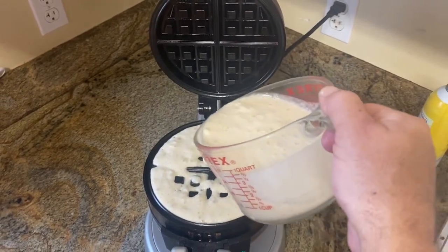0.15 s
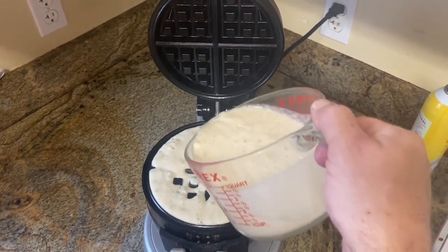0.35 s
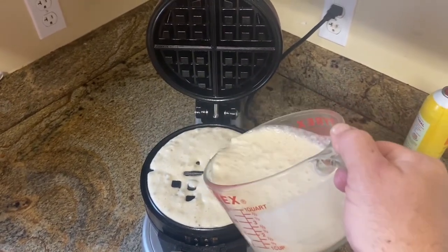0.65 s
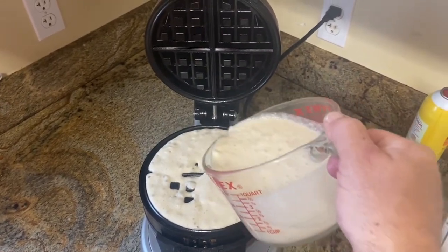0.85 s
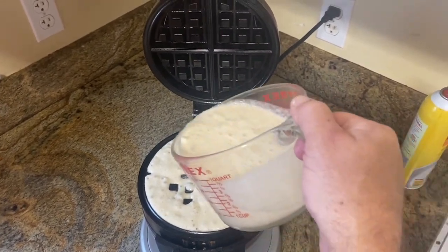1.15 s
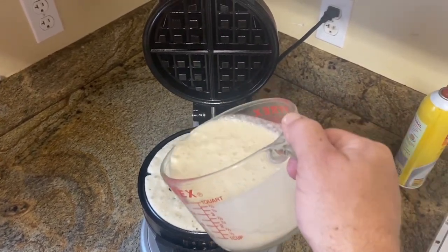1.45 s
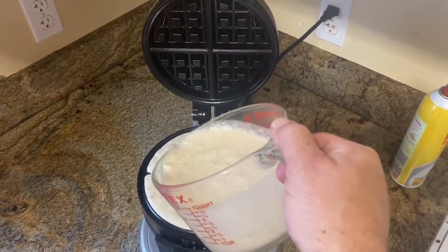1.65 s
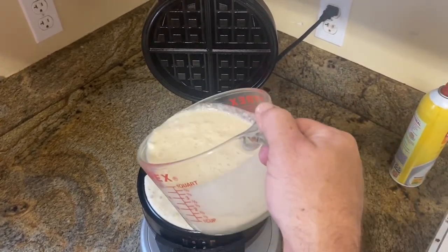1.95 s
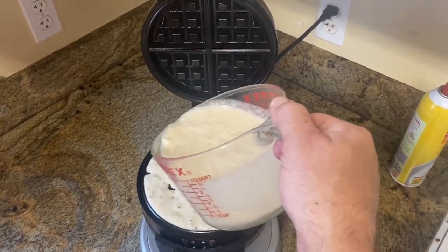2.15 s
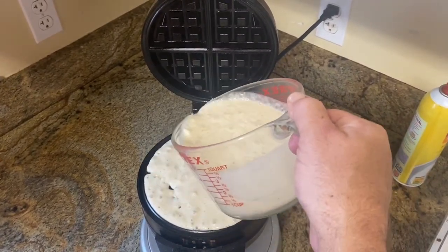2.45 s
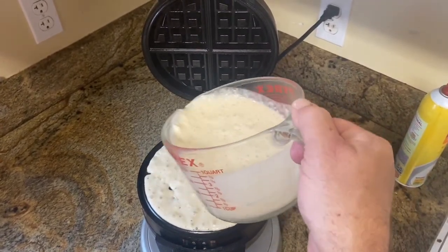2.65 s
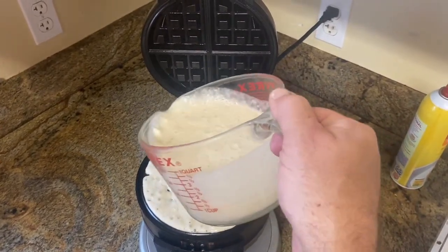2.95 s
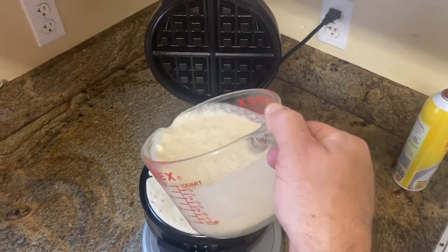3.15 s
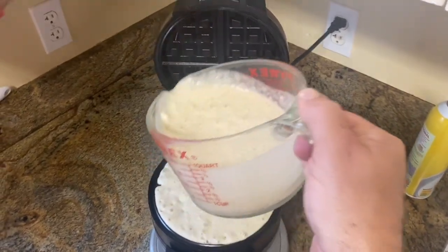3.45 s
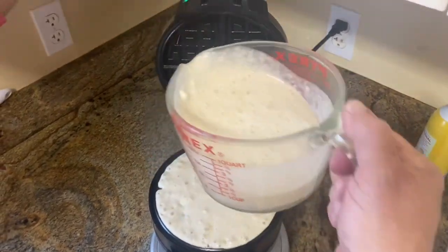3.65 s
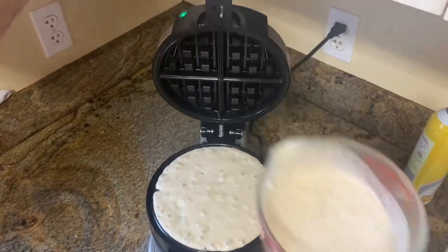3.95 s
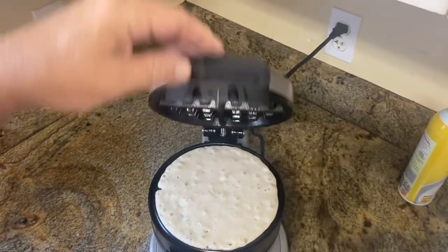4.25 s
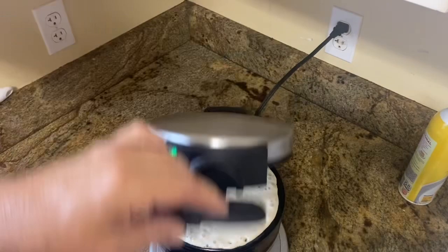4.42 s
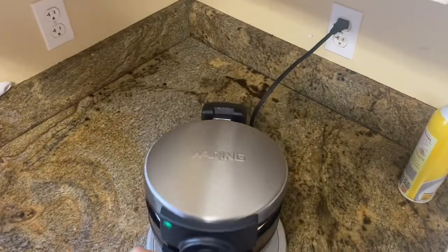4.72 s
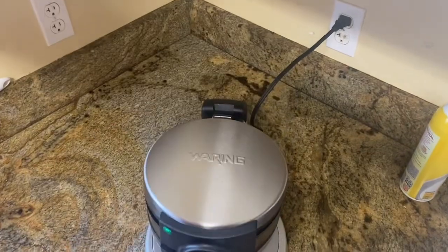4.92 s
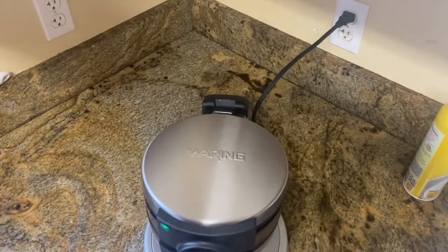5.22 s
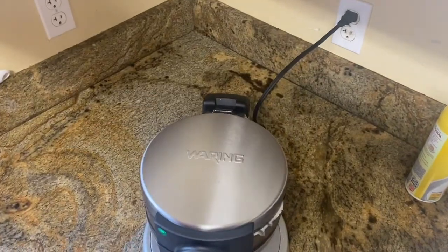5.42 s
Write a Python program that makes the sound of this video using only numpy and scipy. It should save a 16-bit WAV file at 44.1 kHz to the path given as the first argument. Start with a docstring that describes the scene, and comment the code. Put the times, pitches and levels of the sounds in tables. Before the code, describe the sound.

Batter sizzles faintly on a hot waffle iron, then the metal lid clunks shut and steam hisses.

```python
"""Batter sizzles on a hot waffle plate in a quiet kitchen; an appliance hums far off.
Single bubbles pop as the fizz slowly calms. The lid swings down and steam hisses from the gap.
At 4.92 s the iron plates clunk together and thump the counter; they rattle, then the catch clicks.
A small camera listens through two ports a few centimetres apart."""
import sys
import numpy as np
from scipy import signal
from scipy.fft import rfft, irfft, next_fast_len
from scipy.io import wavfile
from scipy.ndimage import uniform_filter1d

SR = 44100
rng = np.random.default_rng(int(sys.argv[2]) if len(sys.argv) > 2 else 0)


def to_wav(sig):
    """Store sig (one row per channel, or 1-D mono) as 16-bit WAV at the path in sys.argv[1].

    Samples outside -1..1 are clipped; the rate is SR.
    """
    pcm = np.clip(np.atleast_2d(sig), -1, 1) * 32767
    pcm = np.round(pcm).astype(np.int16)
    wavfile.write(sys.argv[1], SR, pcm.T)  # frames by channels


N = 246078
LEAD_IN_S = 0.02  # run-up to each contact

# modes of the iron plates: pitch_hz, level_db, t60_s
PLATE_MODES = [(233, 3, 0.054), (317.4, 1, 0.065), (430, -1.5, 0.038), (519, -1, 0.035), (620, 5.5, 0.042),
               (663, -1.5, 0.046), (728, -10, 0.052), (770, -8, 0.064), (812, -7, 0.04), (883, -2, 0.057),
               (980, -7, 0.06), (1076, 4, 0.02), (1190, -0.5, 0.025), (1245, -4, .03), (1384, 4.5, 0.02),
               (1550, -7, 0.018), (1706, 3.5, 0.015), (1800, -4, 0.02), (2014, -7, 0.026),
               (2110, -3, 0.037), (2240, -4, .02), (2400, 1, 0.02), (2560, -5, 0.022), (2710, 4.5, 0.015),
               (2940, 5.5, 0.016), (3260, 2.5, 0.013), (3650, -1, 0.0089), (4220, 6.5, 0.011),
               (4800, 1, .008), (5400, -4, .008)]


def amp(db):
    return 10 ** (np.asarray(db) / 20)


def unit_rms(x):
    return x / np.sqrt(np.mean(x ** 2) + 1e-20)


def at_hz(points, hz, column=1):
    """Table column, interpolated over log frequency."""
    table = np.transpose(points)
    return np.interp(np.log(hz + 1), np.log(table[0] + 1), table[column])


def coloured(x, colour):
    """Stereo signal shaped by a spectrum, rms 1."""
    size = next_fast_len(N)
    gain = amp(at_hz(colour, np.fft.rfftfreq(size, 1 / SR)))
    return unit_rms(irfft(rfft(x, size) * gain, size)[:, :N])


def band(x, low_hz, top_hz):
    """Band-pass that keeps the rms of white noise."""
    passed = signal.sosfilt(signal.butter(3, [low_hz, top_hz], "band", fs=SR, output="sos"), x)
    return passed / np.sqrt((top_hz - low_hz) / SR * 2)


def drift(smooth_s):
    """Smoothed noise, rms 1."""
    size = round(smooth_s * SR)
    return unit_rms(uniform_filter1d(uniform_filter1d(rng.standard_normal(N), size), size))


def house():
    """Lumpy low murmur and the wavering hum of a distant motor."""
    # murmur envelope: time_s, level_db
    envelope = [(0, -54), (.3, -56), (.6, -56.5), (1.5, -53.5), (2, -57), (3.0, -56.5), (4.2, -56.5),
                (4.8, -54.5), (5.58, -48.5)]
    # murmur spectrum: freq_hz, gain_db
    colour = [(15, -45), (30, -21), (42, 0.5), (52, 2), (65, 2.5), (80, 0), (140, -7.5), (200, -1.5),
              (270, -8), (330, -3.5), (400, -9.5), (550, -14), (900, -18), (1500, -21.5), (3000, -21),
              (5000, -78)]
    # motor lines: pitch_hz, width_hz, level_db
    hum_lines = [(98.8, 7.7, -56.5), (120.3, 6.4, -67), (203.3, 8.7, -67), (235, 6.3, -68.5),
                 (301.3, 14.5, -67.5), (426, 16, -72)]
    throb_period_s, throb_crest_s, throb_depth = 0.752, 1.08, 0.29  # lowest line only
    t = np.arange(N) / SR
    murmur_db = np.interp(t, *np.transpose(envelope)) + 1.1 * drift(0.019)
    sound = amp(murmur_db) * coloured(rng.standard_normal((2, N)), colour)
    throb = 1 + throb_depth * np.cos(2 * np.pi * (t - throb_crest_s) / throb_period_s)
    for hz, width_hz, db in hum_lines:
        waver = 0.5 * (drift(0.38 / width_hz) + 1j * drift(0.31 / width_hz))
        strength = throb if hz == hum_lines[0][0] else 1
        sound += amp(db) * ((strength + waver) * np.exp(2j * np.pi * hz * t)).real
    return sound


def kitchen_reverb(x, level_db=-15, delay_s=0.0037):
    """Room tail: noise, each band dying at its own rate."""
    # room decay: freq_hz, t60_s
    decay = [(100, 0.099), (500, 0.59), (2000, 0.46), (5000, 0.4), (12000, 0.18)]
    hz, t, spectra = signal.stft(rng.standard_normal((2, SR // 2)), SR, nperseg=256)
    tail = signal.istft(spectra * amp(-60 * t / at_hz(decay, hz)[:, None]), SR, nperseg=256)[1]
    tail = np.pad(tail, ((0, 0), (round(delay_s * SR), 0)))
    return amp(level_db) * signal.fftconvolve(x, tail / np.linalg.norm(tail[0]), axes=1)[:, :N]


def bubbling(rate_per_s, spread_db, grain, flicker_db):
    """Countless tiny bubbles: smooth hiss, with nearer millisecond bursts standing out."""
    sizes = amp(spread_db * np.minimum(rng.exponential(1, N), 3.2))
    onsets = rng.random(N) < rate_per_s / SR
    bursts = signal.lfilter([1], [1, -np.exp(-1 / (0.0012 * SR))], sizes * onsets)
    envelope = amp(flicker_db * drift(0.0049)) * np.sqrt(1 + (grain * unit_rms(bursts)) ** 2)
    return envelope * rng.standard_normal((2, N))


def patchy(x, depth_db):
    """Brief spurts in shifting bands as the bubbling spots wander."""
    spectra = signal.stft(x, nperseg=256)[2]
    patches = uniform_filter1d(rng.standard_normal(spectra.shape[1:]), size=8, axis=0)
    patches = uniform_filter1d(patches, size=24, axis=1)
    return signal.istft(spectra * amp(depth_db * unit_rms(patches)), nperseg=256)[1][:, :N]


def rim_hiss(level_db=-60.5):
    """Fine, steady hiss from the batter's rim, exposed as the fizz calms."""
    # hiss spectrum: freq_hz, gain_db
    colour = [(2500, -27), (3900, -13), (4800, -4), (5600, -11), (6300, -6), (8000, -0.5), (11000, 0.5),
              (13000, -3), (16000, -7.5)]
    bubbles = bubbling(rate_per_s=250, spread_db=3.2, grain=0.9, flicker_db=1.8)
    return amp(level_db) * patchy(coloured(bubbles, colour), depth_db=0.7)


def batter_fizz():
    """Batter on hot iron: calms to a simmer, drops again under the shut lid."""
    # fizz spectrum: freq_hz, gain_db
    colour = [(500, -20.5), (900, -12), (1300, -12.5), (1650, -4.5), (2240, -7.5), (2500, -1.5), (2800, -7),
              (3400, -2.5), (3900, -2), (4500, -2), (5300, -1), (6300, -4), (8000, -1.5), (10500, 0),
              (12000, -1), (14000, -9), (16000, -9)]
    # swells as batter spreads, then a dip as the lid lowers: centre_s, gain_db, width_s
    swells = [(.8, 1.5, 0.034), (1.0, 1.5, 0.53), (3.2, 2.5, 0.097), (4.1, 4, 0.26), (4.65, -1.5, .2)]
    start_db, calming_db_per_s, simmer_db = -42.5, 5.5, -61.5
    shut_s, covered_db = 4.92, -64
    t = np.arange(N) / SR
    level_db = np.where(t < shut_s, np.maximum(start_db - calming_db_per_s * t, simmer_db), covered_db)
    level_db += sum(db * np.exp(-((t - centre_s) / width_s) ** 2) for centre_s, db, width_s in swells)
    bubbles = bubbling(rate_per_s=500, spread_db=1.5, grain=0.51, flicker_db=0.88)
    return amp(level_db) * patchy(coloured(bubbles, colour), depth_db=0.84)


def pops():
    """Single bubbles burst: a spit of noise and a short ring at the bubble's pitch."""
    # loudest bubbles: start_s, spit_db, pitch_hz, ring_db
    bursts = [(0.1685, -28, 3930, -48), (1.865, -36, 3830, -50), (1.9737, -36, 4750, -52),
              (2.0795, -41, 7040, -52), (2.1515, -44, 7820, -52), (2.284, -40, 6250, -55),
              (2.3304, -34, 7590, -52), (2.391, -35, 7090, -48), (2.493, -34, 7550, -54),
              (2.503, -34, 4400, -47), (2.592, -44, 7100, -52), (2.6117, -37, 7900, -47),
              (2.700, -44, 4780, -52), (2.810, -38, 4790, -53), (2.832, -32.5, 7400, -50),
              (2.8886, -42, 7850, -54), (2.932, -34.5, 4800, -43), (3.1227, -37, 6900, -49),
              (3.2132, -36, 6860, -51), (3.2393, -38, 4770, -51), (3.5307, -39, 7550, -52),
              (3.84, -35.5, 7660, -53), (3.878, -34, 4150, -48), (3.9708, -36, 6950, -52),
              (3.989, -41, 7370, -53), (4.1587, -42, 5180, -54), (4.1767, -41, 7560, -53),
              (4.237, -35, 2230, -41), (4.366, -38.5, 7600, -54), (4.4825, -36.5, 2300, -44),
              (4.494, -43, 4200, -52), (4.606, -42, 3000, -55), (4.652, -41, 3000, -55),
              (4.8118, -42, 7290, -50)]
    # spit spectrum: freq_hz, gain_db
    colour = [(800, -18), (2000, -6), (4000, -3), (7000, 0), (11000, 3.5), (14000, -6), (16000, -9)]
    rise_s, spit_fade_s, ring_fade_s = 0.0004, 0.0017, 0.0028
    spits, rings = np.zeros((2, 2, N + SR))
    t = np.arange(SR // 20) / SR
    attack = np.minimum(t / rise_s, 1)
    for start_s, spit_db, hz, ring_db in bursts:
        at = slice(round(start_s * SR), round(start_s * SR) + len(t))
        noise = 0.5 * rng.standard_normal((2, len(t)))
        spits[:, at] += amp(spit_db) * noise * np.exp(-t / spit_fade_s) * attack
        rings[0, at] += amp(ring_db) * np.sin(2 * np.pi * hz * t) * np.exp(-t / ring_fade_s) * attack
    return coloured(spits[:, :N], colour) * np.std(spits[:, :N]) + rings[:, :N]


def steam(split_hz=4500):
    """Steam from the narrowing gap: thin at first, fuller as the plates close."""
    # steam spectrum: freq_hz, gain_db
    colour = [(1000, -24), (3000, -6.5), (5000, -5), (6000, -3.5), (7500, 0.5), (11000, -1.5), (12500, -5),
              (14000, -16), (16000, -12)]
    # steam envelope: time_s, level_db, gain_below_split_db
    envelope = [(4.7, -78, -10), (4.78, -61, -9), (4.825, -50.5, -7), (4.89, -47, -3), (4.92, -43, -3),
                (4.98, -50, -5), (5.08, -45, 1), (5.2, -44.5, -0.5), (5.58, -42, 2)]
    t = np.arange(N) / SR
    time_s, level_db, low_db = np.transpose(envelope)
    hiss = coloured(bubbling(rate_per_s=330, spread_db=3.3, grain=0.38, flicker_db=0.44), colour)
    low = signal.sosfiltfilt(signal.butter(3, split_hz, fs=SR, output="sos"), hiss)
    hiss = hiss - low + amp(np.interp(t, time_s, low_db)) * low
    return amp(np.interp(t, time_s, level_db)) * hiss


def counter_thump(t, hz, rise_s):
    """Counter rocks, falling in pitch to hz; a sudden landing rings a higher, shorter mode most."""
    fade_s, overshoot, drop_s = 0.046, 2.98, 0.00524
    knock_ratio, knock_db, knock_fade_s, sudden_s = 2.164, 4, 0.0118, 0.0095
    turns = hz * (t + overshoot * drop_s * (1 - np.exp(-t / drop_s)))
    thump = np.sin(2 * np.pi * turns) * (1 - np.exp(-t / rise_s)) ** 2 * np.exp(-t / fade_s)
    knock = np.sin(2 * np.pi * knock_ratio * hz * t) * t / knock_fade_s * np.exp(-t / knock_fade_s)
    return thump + amp(knock_db) * min(sudden_s / rise_s, 1) ** 1.07 * knock


def contact_noise(length_s, graze_db=-11.5, graze_s=0.0044):
    """Edges graze in the lead-in, then meet: fast rise, bell-curve fall."""
    t = np.arange(SR // 2) / SR - LEAD_IN_S
    impact = np.exp(-(t / length_s) ** 2) * np.clip(t / (0.075 * length_s), 0, 1)
    graze = amp(graze_db) * np.exp(-abs(t) / graze_s)
    return rng.standard_normal((2, len(t))) * (impact + graze)


def ringing(drive, modes):
    """Decaying modes excited by the drive."""
    t = np.arange(SR // 2) / SR
    ring = sum(amp(db - 60 * t / t60_s) * np.sin(2 * np.pi * hz * t) for hz, db, t60_s in modes)
    return signal.oaconvolve(drive, ring[None] / np.linalg.norm(ring), axes=1)[:, :N]


def free_ring(t, favoured_hz):
    """Plate modes near the favoured pitches, left free by the struck spot, ring longer."""
    width_octaves, t60_stretch, rise_s = 0.064, 2.2, 0.0036
    ring = np.zeros(len(t))
    for hz, _, t60_s in PLATE_MODES:
        weight = sum(np.exp(-(np.log2(hz / near) / width_octaves) ** 2) for near in favoured_hz)
        ring += weight * amp(-60 * t / (t60_stretch * t60_s)) * np.sin(2 * np.pi * hz * t)
    return ring * np.minimum(t / rise_s, 1)


def waffle_iron():
    """Each blow rings the plates and catch and rocks the counter; the loose plates chatter on."""
    # blows: start_s, plates_db, chatter_db, catch_db, thump_db, thump_hz, thump_rise_s,
    # length_s, low_hz, top_hz, ring_db, favoured_1_hz, favoured_2_hz
    blows = [(.159, -53, -80, -80, -50, 179.4, 0.0042, 0.012, 151, 584, -70, 320, 430),
             (0.197, -60, -73, -80, -42.5, 82.3, 0.0064, .01, 149, 407, -68, 233, 320),
             (4.922, -7.5, -23.5, -22.5, -52, 69, 0.0081, 0.0075, 770, 4200, -11.5, 1185, 1800),
             (4.9265, -11.5, -21.5, -30, -17, 69.4, 0.027, 0.0056, 224, 4800, -15, 310.4, 620),
             (4.963, -35, -45, -45, -50, 69, .007, .005, 700, 2500, -29, 2080, 980),
             (4.989, -35.5, -49, -46, -35, 68.4, .007, 0.025, 300, 2510, -29, 865, 2014),
             (5.122, -39, -40, -59, -31.5, 66.1, 0.018, 0.02, 400, 2480, -40, 1830, 1550),
             (5.213, -34, -34.5, -49, -30, 56.6, .015, 0.0092, 400, 1540, -28, 526, 1396),
             (5.262, -32, -41, -30, -36, 60, 0.0066, 0.0025, 3800, 5200, -47, 2710, 4290),
             (5.298, -31.5, -36, -45, -35.5, 54.6, 0.0053, 0.011, 458, 2130, -26.5, 620, 1640),
             (5.4167, -21.5, -23.5, -15, -27, 53.8, 0.005, 0.0094, 297, 8500, -24, 430, 1245),
             (5.435, -32, -44, -26, -59, 53, 0.0076, 0.0059, 600, 3800, -25.5, 748, 650),
             (5.472, -46.5, -54, -34.5, -29.5, 50.5, 0.0062, 0.041, 534, 960, -33, 760, 670)]
    # hand and hinge rubs: start_s, length_s, level_db, low_hz, top_hz
    rubs = [(0, 0.24, -60, 285, 503), (4.299, 0.2, -66, 493, 860), (4.6, 0.1, -69, 395, 800),
            (5.278, 0.033, -39.5, 800, 4000)]
    # modes of the catch: pitch_hz, level_db, t60_s
    catch_modes = [(2275, -2.5, 0.029), (4050, -9, 0.011), (4140, 1, 0.013), (4580, 1.5, 0.013),
                   (4750, -6, 0.0079), (6400, -30, 0.0051), (7470, -4, 0.026), (7930, 5.5, 0.019),
                   (8240, -1, 0.0064), (10160, 6, 0.0089), (11570, 4.5, 0.0084), (11950, 4, 0.0066),
                   (14900, -5, 0.0066)]
    chatter_fade_s, chatter_band_hz, catch_chatter_db = 0.022, (249, 3400), -15
    tracks = np.zeros((4, 2, N + SR))  # begin one lead-in early
    plates, catch, thump, ring = tracks
    t = np.maximum(np.arange(SR // 2) / SR - LEAD_IN_S, 0)
    settling = np.exp(-t / chatter_fade_s)
    for (start_s, plates_db, chatter_db, catch_db, thump_db, thump_hz, thump_rise_s,
         length_s, low_hz, top_hz, ring_db, *favoured_hz) in blows:
        at = slice(round(start_s * SR), round(start_s * SR) + len(t))
        contact = contact_noise(length_s)
        chatter = rng.standard_normal((2, len(t))) * settling * np.minimum(t / length_s, 1)
        # a soft contact starves the high modes, a light one the low modes
        plates[:, at] += amp(plates_db) * band(contact, low_hz, top_hz)
        plates[:, at] += amp(chatter_db) * band(chatter, *chatter_band_hz)
        catch_drive = contact + amp(catch_chatter_db) * chatter * settling  # settles twice as fast
        catch_band = signal.butter(2, [low_hz, 2 * top_hz], "band", fs=SR, output="sos")
        catch[:, at] += amp(catch_db) * signal.sosfilt(catch_band, catch_drive)
        thump[:, at] += amp(thump_db) * counter_thump(t, thump_hz, thump_rise_s)
        ring[:, at] += amp(ring_db) * free_ring(t, favoured_hz)
    for start_s, length_s, db, low_hz, top_hz in rubs:
        at = slice(round(start_s * SR), round(start_s * SR) + len(t))
        plates[:, at] += amp(db) * band(contact_noise(length_s), low_hz, top_hz)
    plates, catch, thump, ring = tracks[:, :, round(LEAD_IN_S * SR):]
    bare_contact = 0.5 * plates + 0.28 * catch
    metal = 0.44 * ringing(plates, PLATE_MODES) + 1.12 * ringing(catch, catch_modes)
    return metal + (bare_contact + thump + ring)[:, :N]


def ports(x, likeness, balance, lead):
    """Two spaced ports: left and right from a shared and an unshared channel."""
    size = next_fast_len(N + SR)
    hz = np.fft.rfftfreq(size, 1 / SR)
    shared, unshared = rfft(x, size)
    alike = np.clip(at_hz(likeness, hz), 0, 1)
    half_tilt = amp(at_hz(balance, hz, column=-1) / 2)
    half_lead = np.exp(1j * np.pi * np.interp(hz, *np.transpose(lead)))
    left = shared / half_lead * half_tilt
    right = (alike * shared * half_lead + np.sqrt(1 - alike ** 2) * unshared) / half_tilt
    return irfft(np.array([left, right]), size)[:, :N]


def scene():
    """Iron, cooking and house as each port hears them."""
    # cooking and house at the ports: freq_hz, likeness_0_to_1, left_over_right_db
    bed_image = [(60, 0.97, 3.5), (200, 0.74, 1.5), (400, 0.63, -2), (800, 0.56, -1), (1390, 0.43, -2),
                 (2030, 0.11, -1), (3160, 0.43, 3), (4400, 0.94, 0), (5900, 0.2, 2), (6500, 1, 0),
                 (16000, 1, 0)]
    # their phase lead at the right port: freq_hz, lead_turns
    bed_lead = [(0, 0), (1300, -0.04), (2200, 0.34), (3100, 0.2), (4000, 0), (6900, 0), (15300, 2),
                (17000, -11)]
    # coherence of the blows: freq_hz, likeness_0_to_1
    iron_likeness = [(60, 1), (130, 1), (290, 0.91), (640, 0.6), (1100, 0.85), (2000, 0.9), (4000, 0.92),
                     (7000, 0.66), (15000, .8)]
    # their balance: freq_hz, left_over_right_db
    iron_balance = [(60, 2), (130, 1.3), (290, -3), (640, -0.5), (1100, -1), (3100, 0.5), (6820, 1),
                    (15000, .3)]
    # their phase lead at the right port: freq_hz, lead_turns
    iron_lead = [(0, 0), (500, 0.14), (1300, 0.12), (2200, 0.25), (4000, -0.03), (7100, 0.07), (15500, 2),
                 (17000, 2.3)]
    iron, bubbles = waffle_iron(), pops()
    bed = bubbles + kitchen_reverb(bubbles) + steam() + batter_fizz() + rim_hiss() + house()
    iron = ports(iron + kitchen_reverb(iron), iron_likeness, iron_balance, iron_lead)
    return iron + ports(bed, bed_image, bed_image, bed_lead)


def record(dry):
    """Capsules lose the deepest bass; converter ceiling, then band limit."""
    low_hz, top_hz = 15.0, 15950
    capsules = signal.sosfilt(signal.butter(2, low_hz, "high", fs=SR, output="sos"), dry)
    band_limit = signal.firwin(511, top_hz, window=("kaiser", 9), fs=SR)
    return signal.oaconvolve(np.clip(capsules, -1, 1), band_limit[None], "same")


dry = scene()
out = record(dry)
to_wav(out)
```